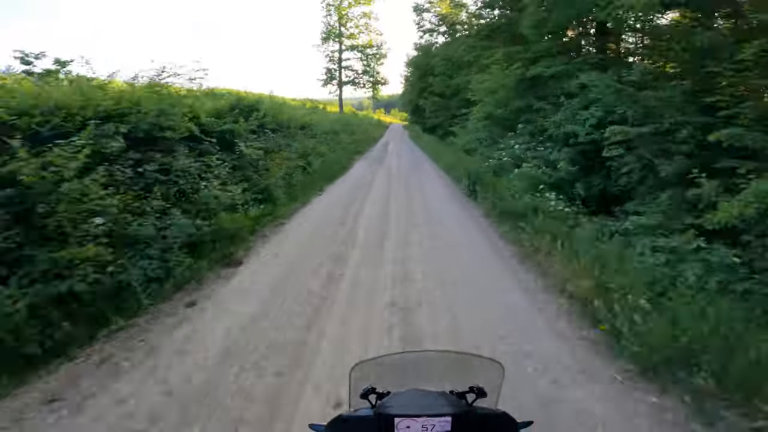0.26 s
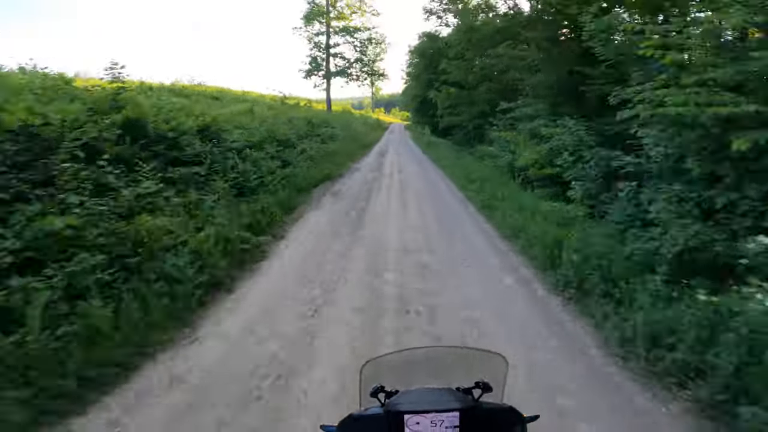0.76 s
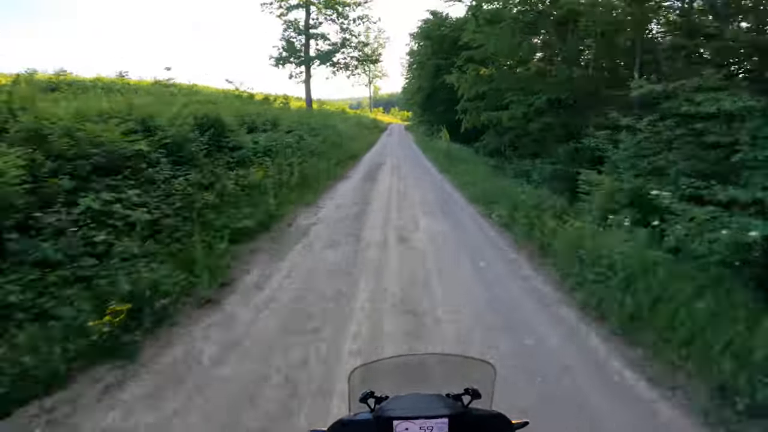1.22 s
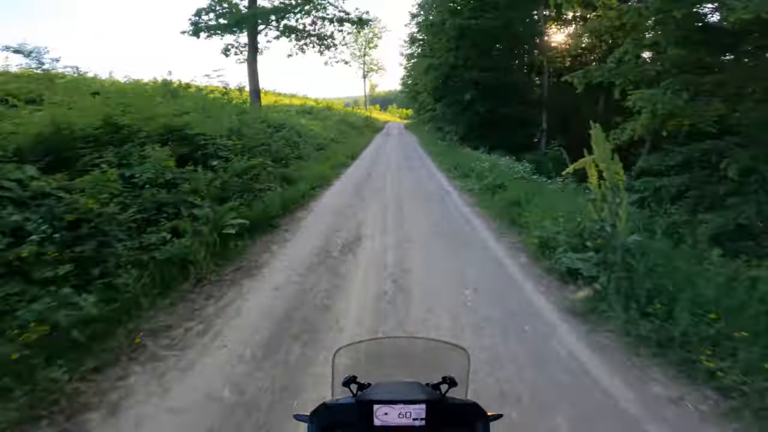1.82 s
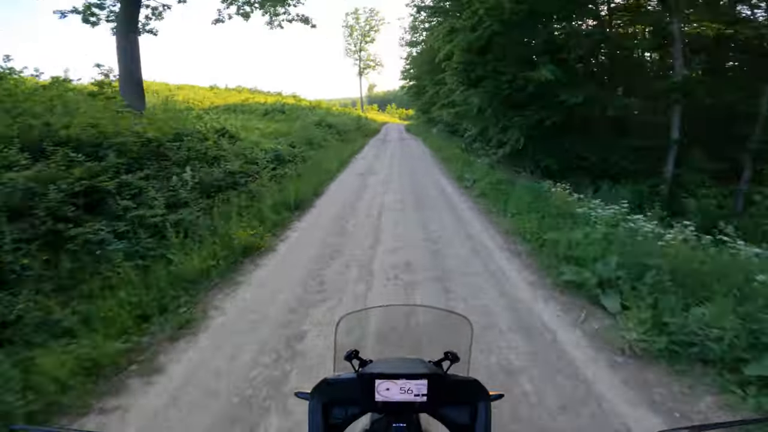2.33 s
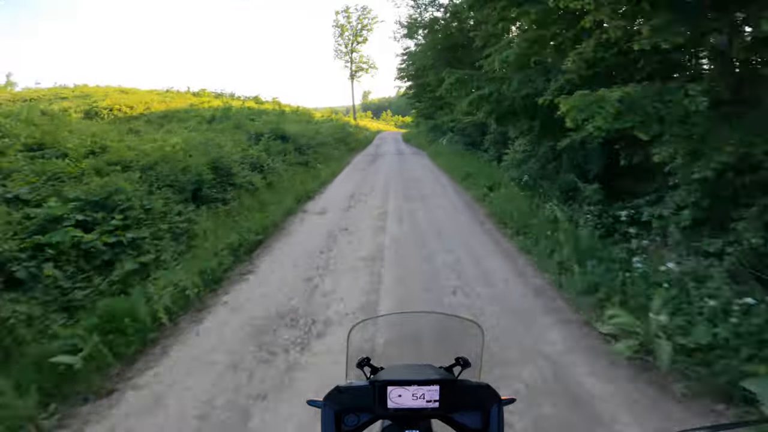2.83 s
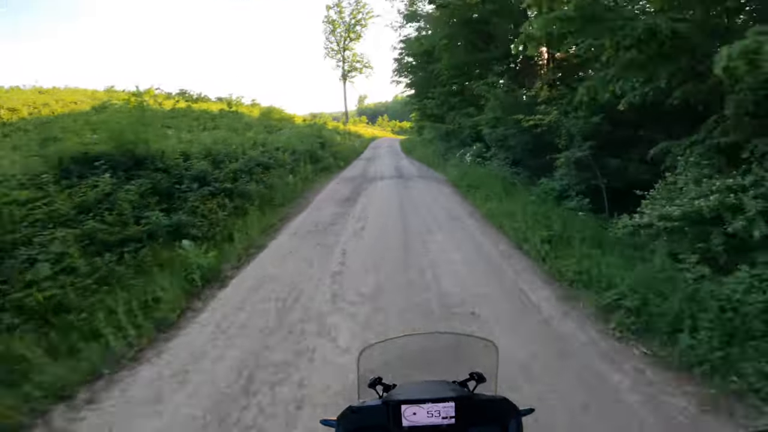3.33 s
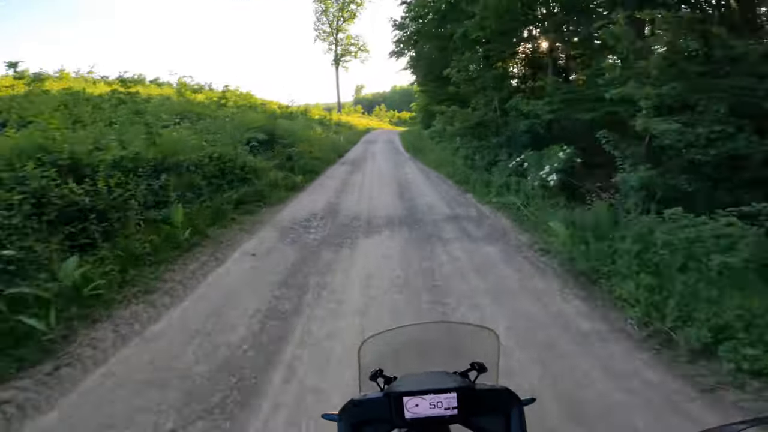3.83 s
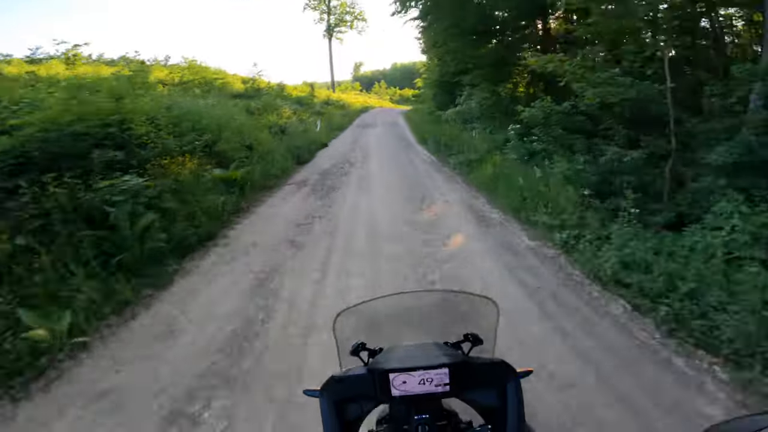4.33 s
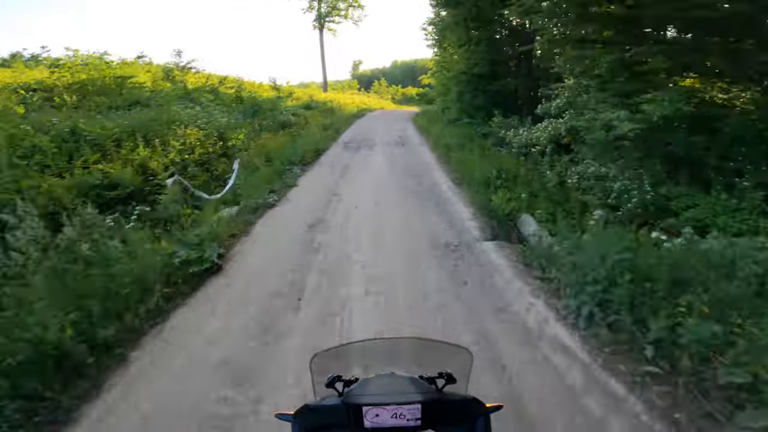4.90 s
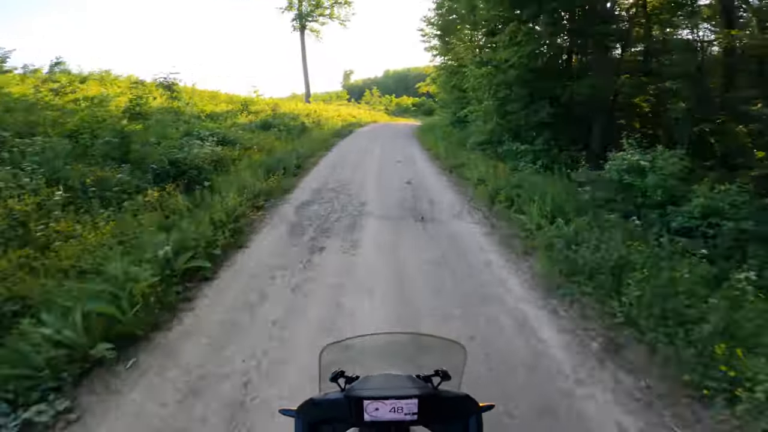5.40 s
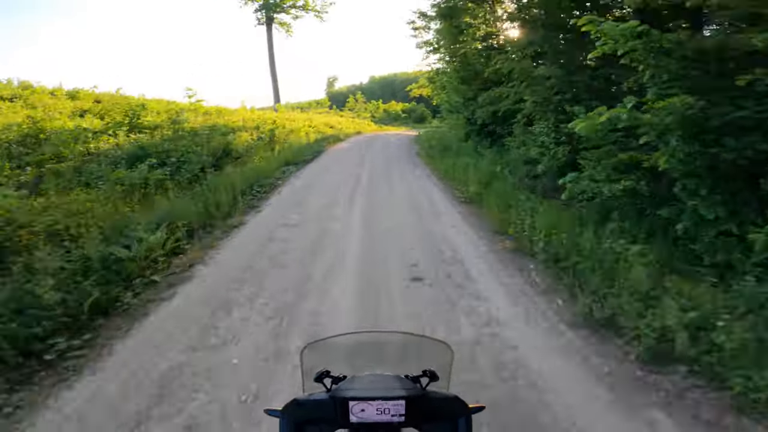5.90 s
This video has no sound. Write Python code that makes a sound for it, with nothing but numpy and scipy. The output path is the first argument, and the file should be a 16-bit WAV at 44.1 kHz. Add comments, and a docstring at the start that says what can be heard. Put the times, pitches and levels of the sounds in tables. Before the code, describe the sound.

Close rider's-seat sound of a twin-cylinder motorcycle on an open gravel track. The throaty engine pulls with slight gear whine and intake rush, then the throttle shuts and it sags into a soft, ragged burble. Chassis knocks punctuate steady tyre roar and wind buffeting. Late on, loose grit sprays, stones tick, and the engine barks and climbs again.

```python
"""Twin-cylinder motorcycle on a gravel road, heard from the rider's seat over wind, tyre roar and bumps.
First the engine pulls: summed partials of its cycle rate, with gear whine and intake rush.
From 1.65 s the throttle is shut: weak, ragged puffs of noise burble while the speed sags.
From 4.43 s loose gravel sprays grit, made of random ringing grains.
From 4.76 s the throttle opens: the engine barks, a pipe overtone rings, and the speed climbs again."""
import sys
import numpy as np
from scipy import signal
from scipy.fft import rfft, irfft
from scipy.io import wavfile

SR = 44100
rng = np.random.default_rng(int(sys.argv[2]) if len(sys.argv) > 2 else 0)


def wav_out(sig):
    """Save sig, one row per channel (or a flat mono array), as 16-bit PCM at SR to the path in sys.argv[1]."""
    wavfile.write(sys.argv[1], SR, np.round(np.clip(np.atleast_2d(sig).T, -1, 1) * 32767).astype(np.int16))


N = 271215
T = np.arange(N) / SR  # s

# Engine speed before drive lash. Each row: time in seconds, four-stroke cycles per second.
ENGINE_SPEED = [(0, 30.3), (1.62, 32.25), (1.69, 31.8), (1.76, 30.55), (2.0, 30.9), (3.8, 26.6),
                (4.15, 26.2), (4.28, 25.7), (4.41, 25.9), (4.49, 24.1), (4.58, 24.6), (4.74, 24.3),
                (4.9, 25.2), (5.1, 25.6), (5.6, 26.45), (6.15, 27.0)]
# Swing from drive slack after each load change. Each row: start in seconds, undamped size in cycles/s.
LASH_SWINGS = [(1.697, -2.5), (4.784, 4)]
# Left-right correlation of the noises. Each row: frequency in Hz, correlation.
LIKENESS = [(20, 0.05), (60, 0.2), (130, 1), (300, 0.93), (600, 0.94), (1100, 0.35), (2000, 0.63),
            (4000, 0.37), (9000, 0.089)]
# Overall balance. Each row: frequency in Hz, right minus left in dB.
RIGHT_LEAN = [(25, -11.5), (60, 5.5), (150, 4.5), (300, 4), (550, 2.5), (1100, 1.5), (2000, -0.5),
              (9000, 0.5)]
# Wind spectrum. Each row: frequency in Hz, relative dB per Hz.
WIND_COLOUR = [(8, -0.5), (18, 12.5), (35, 9.5), (70, 2.5), (130, 1.5), (250, -20), (800, -58)]
# Tyre roar through the bodywork. Each row: frequency in Hz, relative dB per Hz.
ROAR_COLOUR = [(100, -13.5), (200, -2.5), (300, -1.5), (420, -6), (520, -1), (600, -0.5), (720, -9),
               (900, -15.5), (1300, -18), (1600, -22), (2200, -26.5), (3000, -38), (6000, -47),
               (15000, -70)]
# Gravel crunch where the track is rough. Each row: time in seconds, level in dB before graininess.
CRUNCH_LEVEL = [(0, -53), (1.5, -69), (2.2, -54.5), (3.2, -67), (4.1, -61.5), (4.6, -57.5), (5.2, -59),
                (6.15, -56.5)]
# Crunch spectrum. Each row: frequency in Hz, relative dB per Hz.
CRUNCH_COLOUR = [(400, -29.5), (800, 2.5), (1050, -5.5), (1300, 3.5), (1550, -14.5), (2500, -16),
                 (5000, -46)]
# Wheels in loose gravel. Each row: start in seconds, length in seconds, level in dB before clumping.
SPRAY_BURSTS = [(4.429, 0.04, -54.5), (4.503, 0.066, -56.5)]
# Flurries of bright chips. Each row: start in seconds, length in seconds, level in dB before clumping.
CHIP_FLURRIES = [(1.30, 0.013, -69), (1.375, .02, -69), (1.965, .025, -74), (2.07, 0.016, -78),
                 (2.22, .035, -81.5), (2.335, .02, -71), (4.315, 0.037, -60.5), (4.378, 0.036, -63.5),
                 (4.58, 0.078, -66), (4.688, 0.034, -64), (4.975, 0.076, -72), (5.12, .025, -71),
                 (5.84, 0.026, -71), (5.90, 0.047, -75)]
# Single stones. Each row: time in seconds, relative level in dB, left minus right in dB before the lean.
STONES = [(0.852, -48, -4), (1.328, -42, 3), (1.3783, -46, -5), (4.333, -49, -4), (4.5664, -43, 3),
          (4.6506, -37, 2), (4.661, -40, -5), (4.707, -42, 2), (4.711, -39, -4), (4.7215, -44, 1),
          (5.008, -39.5, 1), (5.9077, -48, 15), (5.931, -44, -4)]
# Grit spectrum. Each row: frequency in Hz, relative dB per Hz.
GRIT_COLOUR = [(1000, -6), (2500, 0), (4500, 0), (7000, -1), (10500, 0), (13000, -1), (15000, -4),
               (16000, -9)]
# Brighter spectrum of loose stones. Each row: frequency in Hz, relative dB.
STONE_COLOUR = [(1000, -24), (3500, -7), (7000, -1), (11000, 0), (14000, -1), (16000, -7)]
# Chassis knocks. Each row: time in seconds, peak in dB, low-pass corner of the blow in Hz.
KNOCKS = [(0.069, -32.5, 795), (1.4415, -26.5, 690), (1.515, -23.5, 705), (1.648, -33, 795),
          (2.101, -24.5, 695), (2.162, -23, 800), (2.556, -30, 755), (2.683, -24, 736), (2.692, -29, 740),
          (2.755, -29.5, 755), (3.2564, -21, 766), (3.309, -26, 700), (3.343, -31, 700), (4.371, -22, 1580),
          (4.377, -27, 804), (5.926, -24.5, 725)]
# Chassis modes. Each row: lowest frequency in Hz, relative dB, t60 in seconds.
CHASSIS_MODES = [(307, -10, 0.054), (429, -3, 0.03), (515, 1.5, 0.044), (594, -1, 0.031), (700, -3.5, 0.02),
                 (960, -2, 0.01), (1308, -5.5, 0.012)]
# Suspension heaves. Each row: time in seconds, envelope peak in dB, frequency in Hz, swell in seconds.
HEAVES = [(4.371, -26.5, 254, 0.0047), (4.384, -31.5, 144, 0.012), (4.458, -20.5, 29.8, 0.019)]
# Chain, valve and intake rush. Each row: frequency in Hz, relative dB per Hz.
RUSH_COLOUR = [(1000, -17), (2400, -9.5), (3200, 3), (3800, 2), (4400, 3.5), (4900, -3), (5400, -1.5),
               (6200, -10.5), (7300, -8), (9500, -11.5), (11000, -18), (16000, -43)]
# Gear whine. Each row: multiple of the cycle rate (rounded for the tone), dB pulling, dB coasting.
WHINE = [(35.2, -61, -74), (42.3, -65.5, -77.5), (45.95, -71.5, -72), (90.9, -88.5, -81)]
# Gear-case resonances. Each row: frequency in Hz, width in Hz, lift in dB.
CASE = [(1109.4, 55, 7), (2600, 370, 9)]
# Burble spectrum. Each row: frequency in Hz, relative dB per Hz.
BURBLE_COLOUR = [(120, -27), (185, -6.5), (225, 7.5), (300, -2), (360, -5.5), (440, -19), (900, -64.5)]
# Exhaust partials at cruising speed, before pipe gain. Each row: multiple of the cycle rate,
# dB pulling, dB coasting, dB gained per extra cycle/s.
ORDERS = [(1, -50, -54.5, 3.5), (2, -32, -27.5, 0.5), (3, -35, -23, 0.44), (4, -41.5, -41.5, 1.2),
          (5, -30, -32.5, -.5), (6, -35.5, -41.5, 0.06), (7, -51.5, -44.5, 2), (8, -41, -44, 2.35),
          (9, -39.5, -52, 0.1), (10, -39, -45, -0.34), (11, -45, -46, -1.5), (12, -44, -47.5, 0.95),
          (13, -54, -61, 1.6), (14, -43.5, -52.5, 2), (15, -62.5, -61.5, -2), (16, -60.5, -66.5, 1.3),
          (17, -63, -63.5, -3.5), (18, -59, -59.5, -1.5), (19, -52.5, -55.5, 0.6), (20, -59, -68, 1.5)]
# Pipe and bodywork response. Each row: frequency in Hz, gain in dB.
PIPE = [(50, -0.5), (85, 1), (130, 1.5), (155, -0.5), (176, -2), (193, -4), (215, 4), (245, -2.5),
        (265, -0.5), (280, -3), (298, -3), (322, 2), (345, 3.5), (370, 3.5), (415, -11), (480, -2.5),
        (507, 9), (540, 3.5), (620, 3)]

# Throttle and drive.
SHUT_S, SHUTTING_S, OPEN_S, OPENING_S = 1.645, 0.059, 4.755, 0.01733
LASH_HZ, LASH_DECAY_S = 5.6, 0.075
CRUISE_CYCLES_PER_S = 30

# Noise levels at cruising speed, and the power of speed by which each grows.
WIND_DB, WIND_POWER = -37.5, 1.1
ROAD_DB, ROAD_POWER = -37.5, 1.66
RUSH_DB, RUSH_POWER = -73.5, 1.3
# Added under load: the rear tyre bites, the intake draws harder.
BITE_DB, INTAKE_DB, INTAKE_LAG_S = 0.13, 8, 0.081

SPRAY_RISE_S, SPRAY_FALL_S = 0.019, 0.034
REBOUND_S, REBOUND_DB = 0.011, -23

# Shares of a cycle: second cylinder's delay, starting crank position, lag of the weak coasting pulses.
SECOND_FIRING, START_TURN, COAST_LAG = 3 / 8, 0.22, 0.245
# Resonances that set the partials' phases: (Hz, width in Hz).
MUFFLER, AIRBOX, BODYWORK = (61, 150), (100, 20), (100, 47)
# Sharper pipe resonances with little gas flowing; also phases only: (Hz, width in Hz).
COAST_BOOM, COAST_RING = (71, 73), (356, 21)
# Intake gulp under load: delay in cycles, strength against the exhaust before the airbox.
GULP_LAG, GULP_SIZE = 0.43, 5.2
# Bark of the low partials and growl of the upper ones after the throttle opens.
SURGE_DB, GROWL_DB, SURGE_S = 2.6, 2, 0.35

EDGE_HZ = 15850


def from_db(db):
    """Decibels to amplitude."""
    return 10 ** (np.asarray(db) / 20)


def unit(x):
    """Scales to an rms of one."""
    return x / np.sqrt(np.mean(x ** 2) + 1e-20)


def follow(rows):
    """Control curve at every sample."""
    return np.interp(T, *np.transpose(rows))


def since(s):
    """Seconds since time s; zero before it."""
    return np.maximum(T - s, 0)


def ramp(s, length_s):
    """Rises from zero to one, starting at time s."""
    return np.minimum(since(s) / length_s, 1)


def across(points):
    """Spectrum table at every FFT frequency, interpolated on a log axis."""
    hz, value = np.transpose(points)
    return np.interp(np.log(np.fft.rfftfreq(N, 1 / SR) + 1), np.log(hz + 1), value)


def colour(x, points):
    """Filters by a table of (Hz, dB)."""
    return irfft(rfft(x) * from_db(across(points)), N)


def drift(rate_hz):
    """Smooth random curve of rms one that changes about rate_hz times a second."""
    values = rng.standard_normal(4096)
    return unit(np.interp(T * rate_hz * 2, np.arange(len(values)), values))


def noise_pair(points):
    """Coloured stereo noise whose left-right correlation follows LIKENESS."""
    shared, apart = rfft(rng.standard_normal((2, N)))
    same = np.clip(across(LIKENESS), -1, 1)
    middle = shared * np.sqrt(1 + same)
    side = apart * np.sqrt(1 - same)
    pair = middle + np.outer([1, -1], side)
    return unit(irfft(pair * from_db(across(points)), N))


def add(mix, s, sound):
    """Mixes a sound in at time s."""
    part = mix[..., max(round(s * SR), 0):][..., :sound.shape[-1]]
    part += sound[..., :part.shape[-1]]


def ride():
    """Engine speed with lash swings, and load from 0 (coasting) to 1 (pulling)."""
    swing = np.zeros(N)
    for s, size in LASH_SWINGS:
        swing += size * np.sin(2 * np.pi * LASH_HZ * since(s)) * np.exp(-since(s) / LASH_DECAY_S)
    load = 1 - ramp(SHUT_S, SHUTTING_S) + ramp(OPEN_S, OPENING_S)
    return follow(ENGINE_SPEED) + swing, load


def pace(power):
    """Gain growing with a power of road speed, taken from engine speed without lash."""
    return (follow(ENGINE_SPEED) / CRUISE_CYCLES_PER_S) ** power


def wind():
    """Lumpy low buffeting that grows with speed."""
    gust_db = 1.2 * drift(5)
    return noise_pair(WIND_COLOUR) * pace(WIND_POWER) * from_db(WIND_DB + gust_db)


def bursts(rows, rise_s, fall_s):
    """Amplitude of gravel bursts: each rises quickly, holds, and trails off."""
    return sum(from_db(db) * ramp(s, rise_s) * np.exp(-since(s + length) / fall_s)
               for s, length, db in rows)


def loose_gravel():
    """Amplitude of the spray while a wheel ploughs through loose gravel."""
    return bursts(SPRAY_BURSTS, SPRAY_RISE_S, SPRAY_FALL_S)


def tyres(turns, load, lumpy_db=0.74, shake_db=1.08, shake_at=0.83, loose_db=2.5):
    """Gravel roars under the tyres and in the bodywork, which the coasting engine shakes once a cycle."""
    shake = (1 - load) * np.cos(2 * np.pi * (turns - shake_at))
    loose = loose_gravel()
    db = ROAD_DB + BITE_DB * load + shake_db * shake
    db = db + loose_db * loose / loose.max() + lumpy_db * drift(22)
    return noise_pair(ROAR_COLOUR) * pace(ROAD_POWER) * from_db(db)


def crunch(grainy_db=4.5):
    """Coarse stones grind under the tyres: noise with a fast random level."""
    return noise_pair(CRUNCH_COLOUR) * from_db(follow(CRUNCH_LEVEL) + grainy_db * drift(60))


def grains(per_s, points, sharpness=6, count=14):
    """Grains of many sizes strike at random; each size rings briefly at its own pitch."""
    out = np.zeros((2, N))
    for hz in np.geomspace(1500, 15000, count):
        struck = rng.random((2, N)) < per_s / count / SR
        clicks = rng.standard_normal((2, N)) * struck
        out += signal.lfilter(*signal.iirpeak(hz, sharpness, fs=SR), clicks)
    return unit(colour(out, points))


def flung_stones(stone_s=0.0006, stone_db=-3.0, chips=0.04, chips_s=0.012):
    """Each stone ticks, scatters a tail of chips, and rebounds with its channels swapped."""
    stones, t = np.zeros((2, N)), T[:SR // 10]
    for s, db, pan_db in STONES:
        decay = np.exp(-t / stone_s) + chips * np.exp(-t / chips_s)
        tick = rng.standard_normal((2, len(t))) * decay
        tick = tick * from_db(db + stone_db + np.array([[pan_db], [-pan_db]]) / 2)
        add(stones, s, tick)
        add(stones, s + REBOUND_S * rng.uniform(0.89, 1.1), tick[::-1] * from_db(REBOUND_DB))
    return colour(stones, STONE_COLOUR)


def grit(load, spray_per_s=16000, flurry_per_s=6000, flurry_rise_s=0.014, flurry_fall_s=0.011,
         dust_db=-100, flung_db=4, clump_db=2.0):
    """Sprayed grains, chip flurries, single stones, and a very faint dust fizz off the driven tyre."""
    spray = grains(spray_per_s, GRIT_COLOUR) * loose_gravel()
    flurries = grains(flurry_per_s, STONE_COLOUR) * bursts(CHIP_FLURRIES, flurry_rise_s, flurry_fall_s)
    clumps = from_db(clump_db * drift(120))
    dust = noise_pair(GRIT_COLOUR) * from_db(dust_db + flung_db * load)
    return (spray + flurries) * clumps + dust + flung_stones()


def bumps(blow_s=0.0026, rattle=0.063):
    """Bumps ring the chassis modes through a short rattle; heaves are swelling, dying sines."""
    out, t = np.zeros((2, N)), T[:SR // 5]
    for s, db, top_hz in KNOCKS:
        ring = np.zeros(len(t))
        for k, (hz, mode_db, t60_s) in enumerate(CHASSIS_MODES):
            decay = from_db(mode_db - 60 * t / t60_s)
            ring += (-1) ** k * decay * np.sin(2 * np.pi * hz * rng.uniform(1.0, 1.04) * t)
        blow = rattle * rng.standard_normal(len(t)) * np.exp(-t / blow_s)
        blow[0] = 1
        # tyre and springs cushion the blow
        cushion = signal.butter(6, top_hz, fs=SR, output="sos")
        knock = signal.sosfilt(cushion, signal.fftconvolve(ring, blow))
        add(out, s, from_db(db) * knock / abs(knock).max())
    for s, db, hz, swell_s in HEAVES:
        swell = t / swell_s * np.exp(1 - t / swell_s)
        add(out, s, from_db(db) * swell * np.sin(2 * np.pi * hz * t))
    return out


def firings(turns, length):
    """Envelope that jumps at each of two unevenly spaced firings and dies away; length in cycles."""
    return unit(sum(np.exp(-((turns - at) % 1) / length) for at in (0, SECOND_FIRING)))


def machinery(turns, load, throb=0.3):
    """Intake, valves and chain rush in time with the firings, louder under load."""
    beat = unit(1 - throb + throb * firings(turns, length=0.17))
    # lags when the throttle opens, not when it shuts
    draw = np.minimum(load, np.interp(T - INTAKE_LAG_S, T, load))
    return noise_pair(RUSH_COLOUR) * beat * pace(RUSH_POWER) * from_db(RUSH_DB + INTAKE_DB * draw)


def gears(turns, speed, load, waver_db=3.0, slop=0.1, chop=0.91, chop_at=0.14, power=3):
    """Meshing teeth whine at multiples of engine speed, in one spurt a cycle under load."""
    out = np.zeros(N)
    for order, pulling_db, coasting_db in WHINE:
        case_db = sum(db / (1 + (2 * (order * speed - hz) / width) ** 2) for hz, width, db in CASE)
        db = pulling_db * load + coasting_db * (1 - load) + case_db + waver_db * drift(16)
        # slop: phase wander in turns
        out += from_db(db) * np.sin(2 * np.pi * (round(order) * turns + slop * drift(14)))
    spurts = unit(np.exp(chop * np.cos(2 * np.pi * (turns - chop_at))))
    return np.sqrt(2) * out * (1 - load + load * spurts * pace(power))


def burble(turns, load, level_db=-45.5, ragged=0.41):
    """While coasting, weak and ragged combustions puff noise through the pipe."""
    puffs = firings(turns, length=1.0) * (1 + ragged * drift(14))
    gas = unit(colour(rng.standard_normal(N), BURBLE_COLOUR))
    return gas * puffs * (1 - load) * from_db(level_db)


def pickup(db=-27, hz=285, ring_s=0.03):
    """The first hard firings after the throttle opens ring a pipe overtone: one decaying sine."""
    out, t = np.zeros(N), T[:SR // 4]
    add(out, OPEN_S + OPENING_S, from_db(db) * np.sin(2 * np.pi * hz * t) * np.exp(-t / ring_s))
    return out


def resonance(hz, centre_hz, width_hz):
    """Complex response of one resonance to a partial."""
    return 1 / (1 + 1j * (hz / centre_hz - centre_hz / hz) * centre_hz / width_hz)


def delayed(order, cycles):
    """Phase turn of one partial for a delay in engine cycles."""
    return np.exp(-2j * np.pi * order * cycles)


def pulse_phases(order, hz):
    """Unit phasors, pulling and coasting: two pulses 270 crank degrees apart, with a gulp under load."""
    if order <= 14:
        pair = -1 - delayed(order, SECOND_FIRING)
        gulp = GULP_SIZE * delayed(order, GULP_LAG) * resonance(hz, *AIRBOX)
        pulling = (pair * resonance(hz, *MUFFLER) + gulp) * resonance(hz, *BODYWORK)
        coasting = pair * delayed(order, COAST_LAG)
        coasting = coasting * resonance(hz, *COAST_BOOM) * resonance(hz, *COAST_RING)
    else:  # higher partials arrive by many paths, which scatter their phases
        pulling = coasting = delayed(order, rng.random())
    return pulling / abs(pulling), coasting / abs(coasting)


def exhaust(turns, speed, load, uneven=0.069, rough=0.072, waver_db=2.0):
    """Exhaust pulses as partials of the cycle: tables set levels, pulse timing and resonances set phases."""
    low, high = np.zeros(N), np.zeros(N)
    spin, wave = np.exp(2j * np.pi * turns), np.ones(N, complex)
    pipe_hz, pipe_db = np.transpose(PIPE)
    for order, (_, pulling_db, coasting_db, rev_db) in enumerate(ORDERS, 1):
        wave, hz = wave * spin, order * speed
        pulling, coasting = pulse_phases(order, hz)
        path = from_db(pulling_db) * load * pulling + from_db(coasting_db) * (1 - load) * coasting
        gain_db = rev_db * (speed - CRUISE_CYCLES_PER_S) + np.interp(hz, pipe_hz, pipe_db)
        partial = (wave * path).real * from_db(gain_db)
        if order <= 6:
            low += partial
        else:
            high += partial * from_db(waver_db * drift(4))
    # no two combustions are equally strong
    low = low * (1 + uneven * drift(25))
    high = high * (1 + rough * drift(30))
    surge = ramp(OPEN_S, OPENING_S) * np.exp(-since(OPEN_S) / SURGE_S)
    return low * from_db(SURGE_DB * surge) + high * from_db(GROWL_DB * surge)


def scene():
    """Wind, road and engine, with faded ends and a left-right balance that varies with frequency."""
    speed, load = ride()
    turns = START_TURN + np.cumsum(speed) / SR
    road = tyres(turns, load) + crunch() + grit(load) + bumps()
    engine = machinery(turns, load) + gears(turns, speed, load) + burble(turns, load)
    engine = engine + pickup() + exhaust(turns, speed, load)
    mix = (wind() + road + engine) * signal.windows.tukey(N, 0.002)
    return irfft(rfft(mix) * from_db(np.outer([-0.5, 0.5], across(RIGHT_LEAN))), N)


def record(dry):
    """The recorder's band limit: a linear-phase low-pass."""
    low_pass = signal.firwin(511, EDGE_HZ, window=("kaiser", 9), fs=SR)
    return signal.oaconvolve(dry, low_pass[None], "same")


dry = scene()
out = record(dry)
wav_out(out)
```